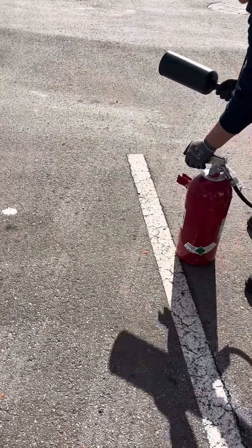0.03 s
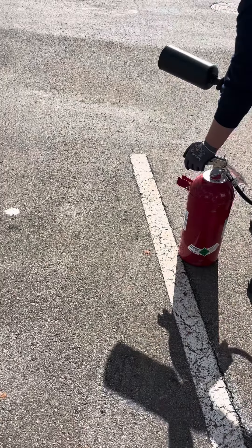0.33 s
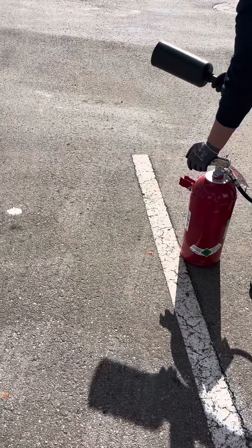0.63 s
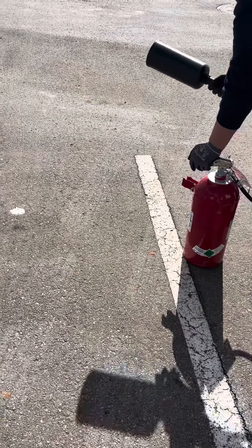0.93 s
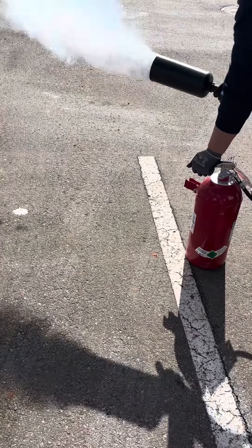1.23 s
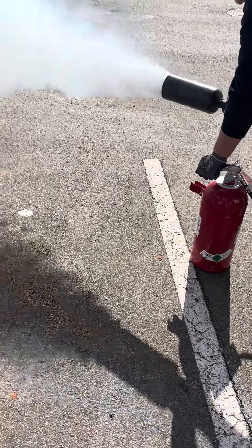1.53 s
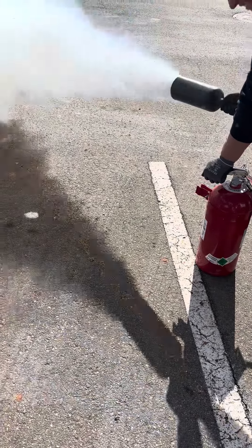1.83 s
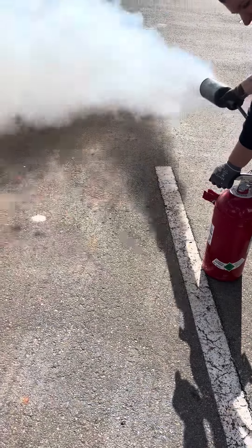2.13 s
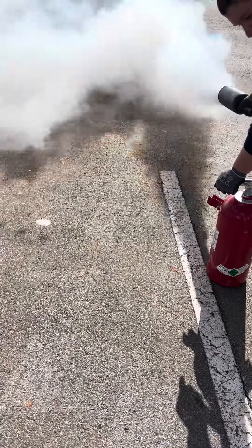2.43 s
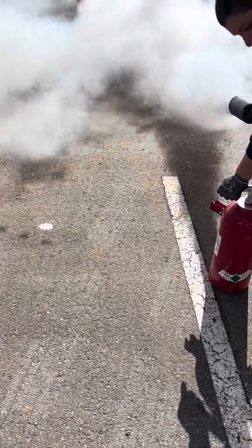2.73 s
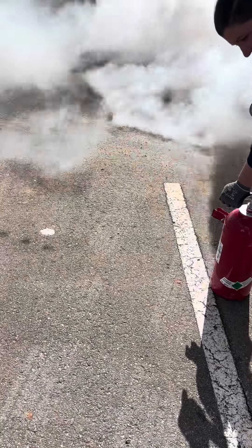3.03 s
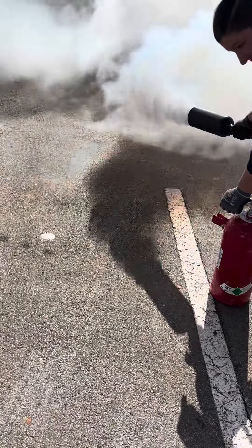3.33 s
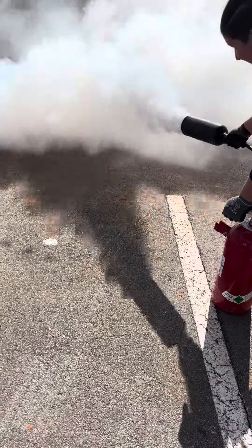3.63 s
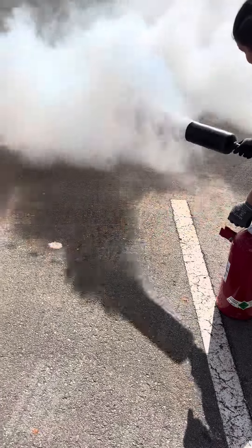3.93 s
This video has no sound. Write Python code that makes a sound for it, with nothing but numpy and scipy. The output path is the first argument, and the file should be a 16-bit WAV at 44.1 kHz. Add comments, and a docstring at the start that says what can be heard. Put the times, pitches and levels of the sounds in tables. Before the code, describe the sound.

A fire extinguisher roars close by outdoors. The first second holds only light breeze, distant rumble, a faint hum and a soft sleeve rustle. At about 1.1 seconds the valve opens with a tick, a hollow puff and a spit, starting a loud, hissing rush of gas. Around 2 seconds it drops slightly and changes tone as the horn swings away, continuing until 4 seconds.

```python
"""A carbon dioxide extinguisher roars on a paved lot, close to a two-port microphone in a light breeze.
Its turbulent jet makes broadband noise, coloured by the resonances of horn and nozzle. A sleeve rustles
first, then the valve opens with a tick, a hollow puff and a spit. The roar drops and changes colour as
the horn swings away; hiss and fizz come and go with the aim. Behind lie a distant rumble and a faint hum."""
import sys
import numpy as np
from scipy import signal
from scipy.io import wavfile
from scipy.ndimage import uniform_filter1d

SR = 44100
rng = np.random.default_rng(int(sys.argv[2]) if len(sys.argv) > 2 else 0)


def output_pcm(signal):
    """Save a mono or channel-first signal as 16-bit PCM at the path in sys.argv[1].

    Samples are clipped to [-1, 1] before scaling.
    """
    pcm = np.clip(np.atleast_2d(signal).T, -1, 1) * 32767
    wavfile.write(sys.argv[1], SR, np.round(pcm).astype(np.int16))


N = 176400
T, HZ = np.arange(N) / SR, np.fft.rfftfreq(2048, 1 / SR)
FRAME_S = np.arange(N // 512 + 5)[:, None] * 512 / SR
OPEN_S, ATTACK_S, LEAK_DB = 1.126, 0.013, -24
FLAT_SHARE, SETTLE_S, BUILD_S = 0.13, 0.52, 0.069  # horn modes start flat and take time to ring fully
PUFF_RISE_S, PUFF_FALL_SHARE, PUFF_FALL_S = 0.0068, 0.252, 0.025
PATCH_DB, FLUTTER_DB, SPUTTER_DB = 2.7, 0.65, 0.4
MONO_HZ = 385  # below this the ports hear more and more alike
LEAD_FROM_HZ, LEAD_S = 4836, 0.0002143  # the treble reaches the left port first

# Spectra of the noise sources. Each row: frequency in Hz, relative spectral density in dB.
AIR_SPECTRUM = [(150, -7.5), (300, -9.5), (420, -18.5), (1100, -23), (1800, -35), (4000, -55), (9000, -79)]
BREEZE_SPECTRUM = [(20, -32), (38, -19), (55, 4.5), (90, 4.5), (140, -6.5), (250, -11), (4000, -79)]
CLOTH_SPECTRUM = [(500, 12), (7000, 2), (15000, -10)]
ROAR_SPECTRUM = [(30, -53), (100, -5), (250, -3.5), (380, -4.5), (700, 0), (1200, -1), (2300, 1),
                 (3200, -6), (6000, -42), (16000, -60)]
HISS_SPECTRUM = [(100, -55), (1500, -7), (2700, -1.5), (4200, 0), (6000, -.7), (9000, -5), (10300, -8.5),
                 (12000, -12), (16000, -22)]
FIZZ_SPECTRUM = [(3000, -50), (10000, -12), (11800, -1), (14000, 0), (15800, -2.5)]
SPIT_SPECTRUM = [(100, -26), (1500, -21), (4200, 8), (7500, 4), (16000, 1)]
# Envelopes of the breeze and the jet's four bands. Each row: time in seconds, relative level in dB.
BREEZE_LEVEL = [(0, -41), (.9, -36), (1.3, -45), (2.9, -49), (3.3, -38), (3.7, -47.5)]
ROAR_LEVEL = [(1.14, -22.5), (1.2, -19), (1.4, -20), (1.8, -22), (2.05, -26.5), (2.3, -28), (2.42, -26.5),
              (2.63, -28), (2.78, -26.5), (3.25, -28), (3.6, -26.5), (3.74, -25.5), (4, -25.5)]
HISS_LEVEL = [(1.17, -18.5), (1.25, -21.5), (1.65, -20), (1.98, -21.5), (2.06, -25.5), (2.2, -26),
              (2.6, -29), (2.8, -28), (3.1, -29), (3.3, -25), (3.62, -24), (3.75, -25.5), (4, -25.5)]
FIZZ_LEVEL = [(1.17, -31), (1.28, -26.5), (1.85, -28), (1.98, -24.5), (2.06, -29.5), (2.2, -31.5),
              (2.4, -29.5), (2.8, -34.5), (3.2, -32.5), (3.5, -30.5), (3.61, -26), (3.72, -33.5),
              (3.9, -30.5)]
WHISTLE_LEVEL = [(1.8, -60), (1.98, -31), (2.25, -31.5), (2.6, -36), (2.8, -45), (3.4, -52)]
# Course of the distant tone. Each row: time in seconds, frequency in Hz, mean level in dB.
HUM_GLIDE = [(0, 289, -51), (.25, 298, -53), (.5, 317.8, -48), (.8, 341.8, -46.5), (1.1, 362, -57),
             (1.3, 365, -75)]
# Brushes of the sleeve. Each row: centre in seconds, half-width in seconds, level in dB.
RUSTLES = [(.012, 0.028, -61), (0.091, 0.021, -61), (0.22, 0.018, -66), (0.15, 0.14, -70)]
# Modes struck by the first gas. Each row: initial frequency in Hz, level in dB, decay time in seconds.
PUFF_MODES = [(376, -15.5, 0.023), (992, -23.5, 0.022)]
# Aim of the horn. Each row: time in seconds, pose (0 side-on, 1 turned away, 2 or more lowered).
HORN_AIM = [(1.35, 0.014), (1.75, 0.11), (1.92, 0.77), (2.08, 0.97), (3.1, 1), (3.5, 2.9)]
# Resonances. Each row: settled frequency in Hz, width in Hz, lift in dB for each of the three poses.
HORN_MODES = [(182, 72, 10.5, 16, 14), (380, 187, 3.5, -5, -2.5), (576.7, 150, 10.5, 13.5, 13),
              (811, 186, -7, 8, 6.5), (1009, 196, 13.5, 5, 1.5), (1313, 245, 2.5, 3.5, 7),
              (1630, 340, 5, 4, 3.5), (2200, 200, 3, 0.5, 1.5)]
NOZZLE_MODES = [(3655, 560, 3.5, 5.5, 4.5), (4840, 1400, 1, 3.5, 0.5), (8300, 940, 1.5, 5, 3.5),
                (13000, 2300, 5, 9.5, 6)]
# Relation between the microphone ports, before the bass and treble adjustments.
# Each row: frequency in Hz, coherence from 0 to 1, left lead in radians, left minus right in dB.
PORTS = [(348, 0.96, -0.73, 1.5), (705, 0.88, -0.95, -5), (940, 0.84, 0.7, -4.5), (1630, 0.93, 0.17, -1),
         (2240, 0.97, 2, 0), (2800, 0.33, 3.5, -1.5), (3480, 0.97, 1.36, -3.5), (4260, 0.07, 2.5, 2.5),
         (5130, 0, 1, 0), (5230, 1, 2.5, -0.5)]


def amp(db):
    """Amplitude ratio of a level in decibels."""
    return 10 ** (np.asarray(db) / 20)


def unit_rms(x):
    """Normalisation to unit mean power."""
    return x / np.sqrt(np.mean(x ** 2) + 1e-20)


def spectrum(table, column=1):
    """Interpolation of one column over log frequency."""
    rows = np.array(table, float)
    return np.interp(np.log(HZ + 1), np.log(rows[:, 0] + 1), rows[:, column])


def envelope(table):
    """Gain for each sample, interpolated in decibels."""
    return amp(np.interp(T, *np.transpose(table)))


def bell(x, centre, width):
    """Gaussian of height 1 and the given full width at half height."""
    return 2 ** -((2 * (x - centre) / width) ** 2)


def drift(shape, spans):
    """Moving averages smooth white noise into a slow random field of rms 1."""
    field = rng.standard_normal(shape)
    for axis, span in enumerate(spans):
        for _ in range(2):
            field = uniform_filter1d(field, span, axis, mode="wrap")
    return unit_rms(field)


def noise(gain):
    """Partial coherence: coloured noise of rms 1 reaches two ports with unequal phase and level."""
    a, b, c, d = rng.standard_normal((4, len(FRAME_S), len(HZ)))
    apart = np.minimum(HZ / MONO_HZ, 1) ** 2
    ceiling = np.where(HZ > LEAD_FROM_HZ, 0.95, 1)
    coherence = 1 - apart ** 2 * (1 - np.clip(spectrum(PORTS), 0, ceiling))
    lead = apart * spectrum(PORTS, column=2) + 2 * np.pi * LEAD_S * np.maximum(HZ - LEAD_FROM_HZ, 0)
    tilt = amp(apart * spectrum(PORTS, column=3) / 2)
    left = a + 1j * b
    right = (coherence * left + np.sqrt(1 - coherence ** 2) * (c + 1j * d)) * np.exp(-1j * lead)
    frames = np.array([left * tilt, right / tilt]) * gain
    _, sound = signal.istft(frames.transpose(0, 2, 1), nperseg=2048, noverlap=1536)
    return unit_rms(sound[:, :N])


def open_air():
    """Ambient noise: a distant rumble, 8 dB lower once the jet starts."""
    dip_db = -8 * np.clip((T - OPEN_S) / ATTACK_S, 0, 1)
    low_cut = np.minimum(HZ / 127, 1) ** 2
    return amp(-41 + dip_db) * noise(amp(spectrum(AIR_SPECTRUM)) * low_cut)


def breeze():
    """Pressure fluctuations of wind on the microphone give a low rumble and one late gust."""
    gust = amp(-33.5) * bell(T, 3.274, 0.24) * noise(bell(HZ, 133, 62))
    return gust + envelope(BREEZE_LEVEL) * noise(amp(spectrum(BREEZE_SPECTRUM)))


def hum():
    """A far tone climbs slowly and wavers by random amplitude modulation."""
    times, hz, db = np.transpose(HUM_GLIDE)
    cycles = np.cumsum(np.interp(T, times, hz)) / SR
    waver_db = 2.5 * drift((N,), spans=(2500,))
    return amp(np.interp(T, times, db) + waver_db) * np.sin(2 * np.pi * cycles)


def sleeve():
    """Friction of cloth gives soft bursts of noise as the horn is raised."""
    brushes = sum(amp(db) * bell(T, centre, 2 * half_width) for centre, half_width, db in RUSTLES)
    return brushes * noise(amp(spectrum(CLOTH_SPECTRUM)))


def swish():
    """Band-limited noise swells faintly and fades."""
    return amp(-74) * bell(T, 0.55, 0.55) * noise(bell(HZ, 3260, 1100))


def valve_tick(hz=2920, decay_s=0.0077):
    """A damped oscillation follows as the valve unseats."""
    age = np.maximum(T - OPEN_S, 0)
    return amp(-28) * np.exp(-age / decay_s) * np.sin(2 * np.pi * hz * age)


def puff():
    """The first gas excites the horn's modes; their pitch falls as cold gas lowers the sound speed."""
    age = np.maximum(T - OPEN_S, 0)
    tuning = 1 - PUFF_FALL_SHARE * (1 - np.exp(-age / PUFF_FALL_S))
    cycles = np.cumsum((age > 0) * tuning) / SR
    rise = np.minimum(age / PUFF_RISE_S, 1) ** 2
    ring_s = np.maximum(age - ATTACK_S, 0)
    return rise * sum(amp(db) * np.exp(-ring_s / decay) * np.sin(2 * np.pi * hz * cycles)
                      for hz, db, decay in PUFF_MODES)


def turbulence(db):
    """Turbulent noise of steady power, whose colour wanders in narrow patches."""
    patches = drift((len(FRAME_S), len(HZ)), spans=(18, 4))
    gain = amp(db + PATCH_DB * patches * np.minimum(HZ / 2000, 1))
    return noise(gain / np.linalg.norm(gain, axis=1, keepdims=True))


def resonances(modes, tuning=1):
    """Directivity: the lift in dB of each resonance depends on the horn's aim."""
    pose = np.interp(FRAME_S, *np.transpose(HORN_AIM))
    return sum(np.interp(pose, (0, 1, 2), lifts) * bell(HZ, hz * tuning, width)
               for hz, width, *lifts in modes)


def jet():
    """Turbulence drives the horn (roar) and nozzle (hiss, fizz, whistle); the flow modulates them all."""
    age = np.maximum(FRAME_S - OPEN_S, 0)
    tuning = 1 - FLAT_SHARE * np.exp(-age / SETTLE_S)
    horn_db = (1 - np.exp(-age / BUILD_S)) * resonances(HORN_MODES, tuning)
    nozzle_db = resonances(NOZZLE_MODES)
    roar = amp(1.56) * envelope(ROAR_LEVEL) * turbulence(spectrum(ROAR_SPECTRUM) + horn_db)
    hiss = envelope(HISS_LEVEL) * turbulence(spectrum(HISS_SPECTRUM) + nozzle_db)
    fizz = envelope(FIZZ_LEVEL) * turbulence(spectrum(FIZZ_SPECTRUM) + nozzle_db)
    whistle = envelope(WHISTLE_LEVEL) * noise(bell(HZ, 15400, 1100))
    flow = amp(FLUTTER_DB * drift((N,), spans=(900,)) + SPUTTER_DB * drift((N,), spans=(60,)))
    # The valve leaks first, then opens fully.
    opening = (T > OPEN_S) * amp(LEAK_DB * np.clip(1 - (T - OPEN_S) / ATTACK_S, 0, 1))
    return opening * flow * (roar + hiss + fizz + whistle)


def spit(start_s=1.135, rise_s=0.0066, decay_s=0.016):
    """A bright noise transient marks the first gas leaving the nozzle."""
    age = np.maximum(T - start_s, 0)
    burst = np.minimum(age / rise_s, 1) * np.exp(-np.maximum(age - rise_s, 0) / decay_s)
    return amp(-12.5) * burst * noise(amp(spectrum(SPIT_SPECTRUM)))


def scene():
    """Superposition of all sources at the microphone."""
    return jet() + valve_tick() + puff() + spit() + sleeve() + open_air() + breeze() + swish() + hum()


def record(dry, cutoff_hz=15680):
    """Clipping limits the amplitude; a low-pass filter limits the bandwidth."""
    low_pass = signal.firwin(511, cutoff_hz, window=("kaiser", 9), fs=SR)
    return signal.oaconvolve(np.clip(dry, -1, 1), low_pass[None], "same")


dry = scene()
out = record(dry)
output_pcm(out)
```